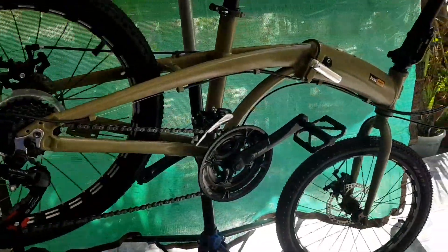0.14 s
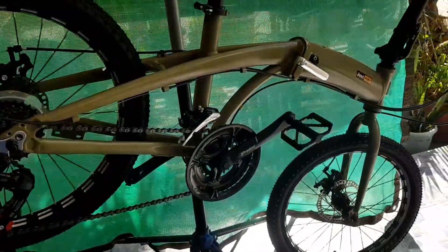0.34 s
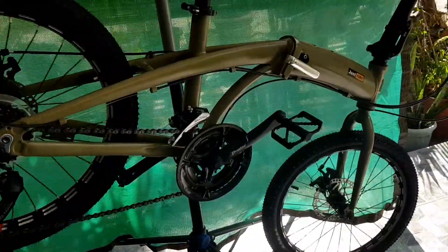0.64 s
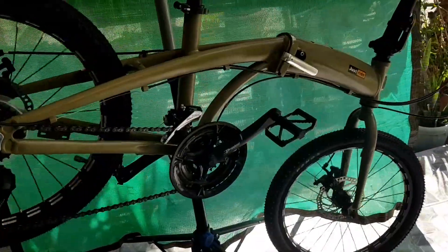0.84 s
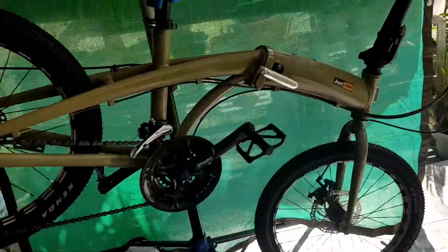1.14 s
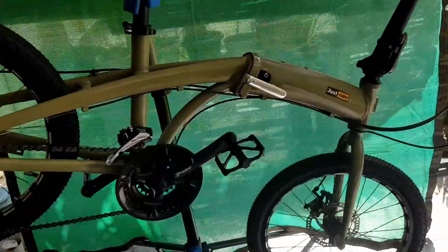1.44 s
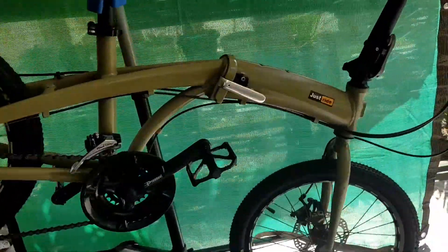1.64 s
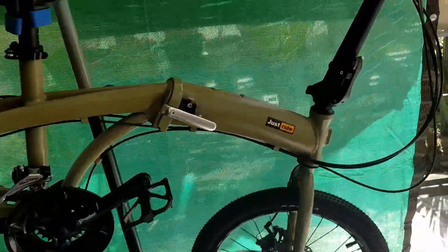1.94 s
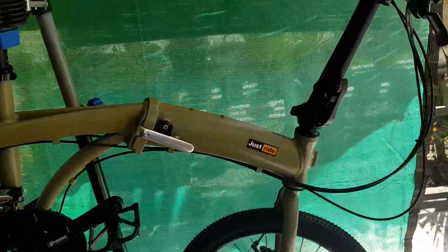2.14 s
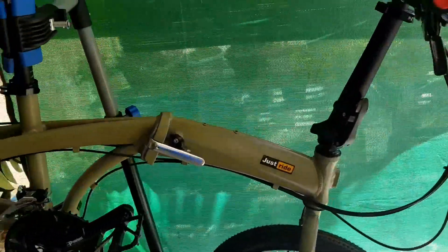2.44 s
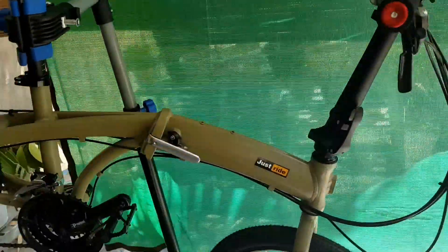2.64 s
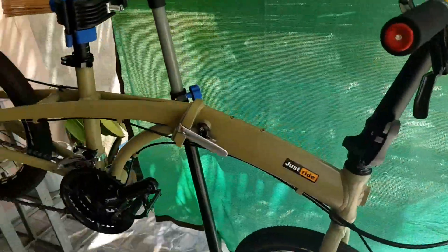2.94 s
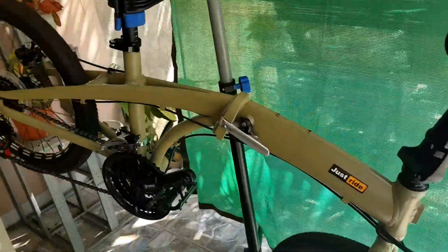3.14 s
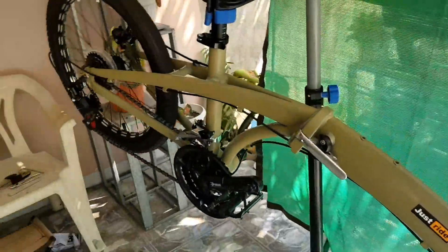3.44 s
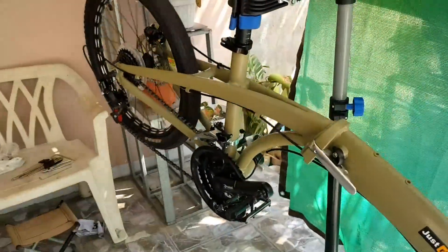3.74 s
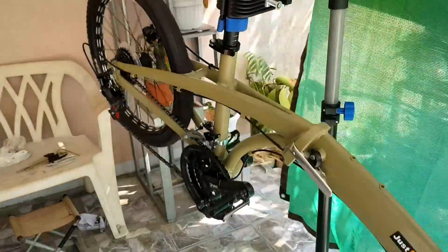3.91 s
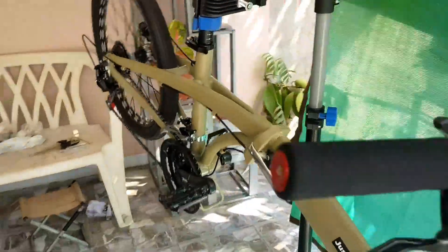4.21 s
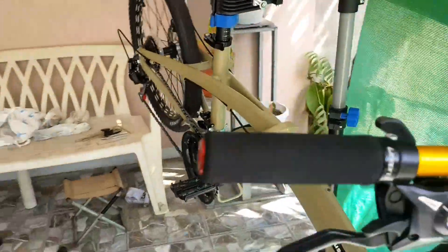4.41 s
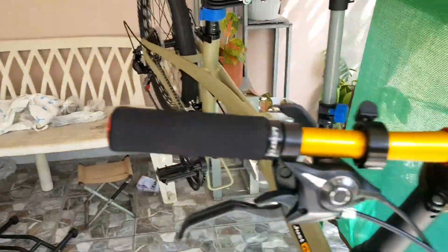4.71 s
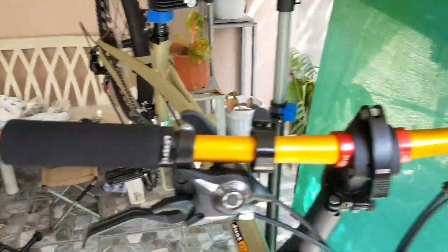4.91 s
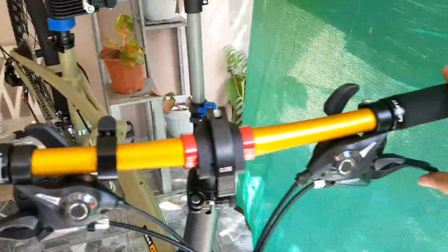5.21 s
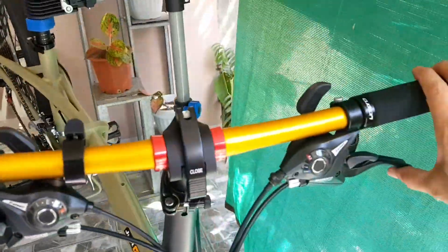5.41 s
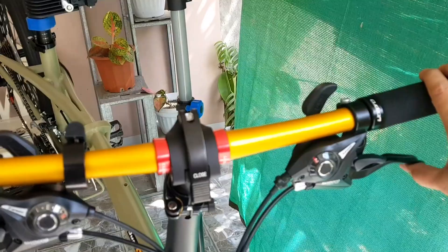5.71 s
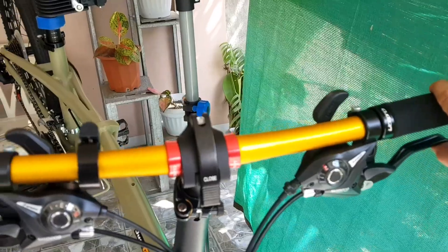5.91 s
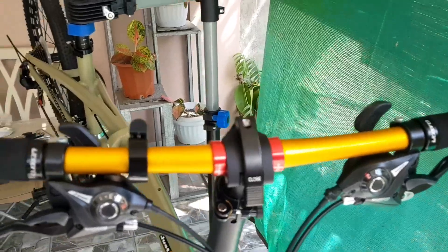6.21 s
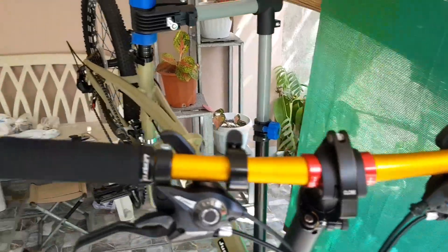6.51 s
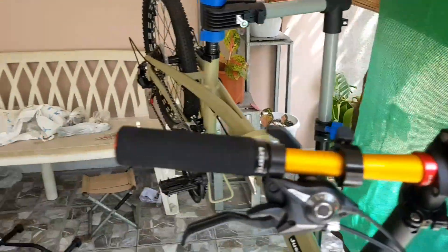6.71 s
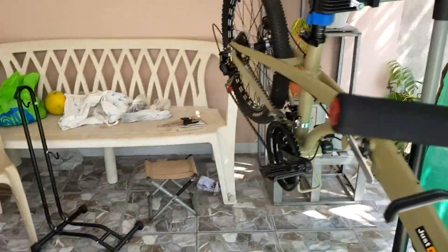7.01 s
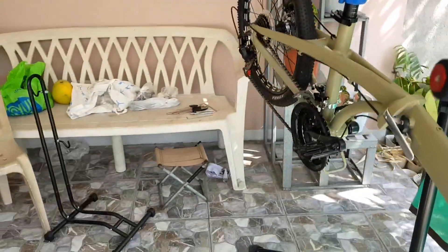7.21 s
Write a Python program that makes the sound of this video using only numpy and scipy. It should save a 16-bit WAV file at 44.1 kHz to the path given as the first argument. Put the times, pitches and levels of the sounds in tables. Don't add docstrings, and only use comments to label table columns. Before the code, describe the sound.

In a small hard-floored covered yard, a steady metallic ratchet buzz of separate crisp clicks gradually slows, with a thin ringing from frame and spokes. Handling bumps, a sharp knock and cloth scuffs strike the moving stereo microphone. Distance softens the clicks and adds short echo. The wheel is braked, a brief gap follows, a lever snaps sharply, and faint wind, distant motor hum and a thin squeak finish.

```python
import sys
import numpy as np
from scipy import signal
from scipy.io import wavfile
from scipy.ndimage import uniform_filter1d

SR = 44100
rng = np.random.default_rng(int(sys.argv[2]) if len(sys.argv) > 2 else 0)


def generate_wav(signal):
    frames = np.transpose(np.atleast_2d(signal))
    scaled = np.clip(frames, -1, 1) * 32767
    pcm = np.round(scaled).astype(np.int16)
    wavfile.write(sys.argv[1], SR, pcm)


def magnitude_from_level(level_db):
    exponent = np.asarray(level_db, float) / 20
    return 10 ** exponent


N = 324135
T = np.arange(N) / SR

# frequency in Hz, level in dB per Hz.
WIND_SPECTRUM = [(15, -42), (30, -5), (52, -8.5), (61, 17), (72, -6), (100, -7), (160, -4.5), (300, -42)]
# start in seconds, length in seconds, level in dB, left-right balance in dB.
GUSTS = [(1.11, .14, -51, 0), (1.56, .38, -63, -4), (2.05, .07, -56, -2), (2.22, .33, -52, -2),
         (2.66, .1, -56, 1), (2.93, .05, -57, 2), (3.43, .17, -54, 0), (3.7, .18, -58, -1),
         (3.92, .06, -47, 1), (4.08, .08, -51, 1), (4.23, .2, -55, -1), (4.5, .14, -53, 0),
         (4.76, .1, -50, 1), (4.92, .1, -51, 7), (5.06, .13, -56, -1), (5.4, .22, -57, 0),
         (5.71, .2, -50, -2), (5.94, .17, -47, 7), (6.15, .1, -43, -10), (6.29, .1, -44, -10),
         (6.41, .1, -49, 0), (6.56, .09, -47, 9), (6.7, .2, -58, 1), (6.95, .1, -57, 2)]
# frequency in Hz, level in dB per Hz.
DRONE_SPECTRUM = [(60, -48.5), (120, 0), (250, -2.5), (450, -3), (600, -15), (1000, -44)]
# frequency in Hz, width in Hz, level in dB.
DRONE_LINES = [(157.4, 1.3, -11.5), (242, 16, -15), (302.5, 5, -11.5), (347.1, 3.7, -9.5),
               (415, 9.9, -10.5), (472.4, 6.7, -13.5), (880, 21, -7)]
# start in seconds, length in seconds, frequency in Hz, level in dB.
MOANS = [(-.2, .72, 57, -57), (2.52, .45, 412, -61), (4.15, .47, 412, -64), (6.18, .55, 158, -57),
         (3.42, 1.25, 62, -57), (1.0, .7, 412, -66), (1.2, .4, 295, -65), (0.1, .7, 235, -66)]
# frequency in Hz, level in dB per Hz.
RUSTLE_SPECTRUM = [(300, -17.5), (600, -2), (900, -2), (1500, -4.5), (4000, -5.5), (7000, -20),
                   (16000, -14.5)]
# frequency in Hz, level in dB per Hz.
HISS_SPECTRUM = [(2000, -12.5), (5000, -31), (7500, -12.5), (10000, 43), (16000, 6)]
# frequency in Hz, likeness from 0 to 1.
LIKENESS = [(60, 0.63), (300, 0.84), (700, 0.25), (1400, 0.15), (5000, 0.057)]
# time in
# seconds, level in dB.
BACKGROUND_LEVEL = [(0, 0.5), (2.95, -0.5), (3.4, -5.5), (3.7, -3), (4.65, -2.5), (5.25, -6.5), (5.7, -5.5),
                    (5.76, -1), (6.1, -3.5), (6.5, -3), (6.85, -9), (7.35, -8.5)]
# time in seconds, left-right balance in dB.
FACING = [(0, 2), (5.6, 2), (6.2, 10), (6.7, 15.5), (7.35, 13)]
# frequency in Hz, time to fall 60 dB in seconds.
ECHO_T60 = [(150, 0.67), (1000, 0.62), (5000, 0.48), (12000, 0.56)]
# start in seconds, length in seconds, level in dB,
# centre frequency in Hz, width in Hz.
SCUFFS = [(1.89, 0.0225, -37.5, 493, 910), (3.926, 0.032, -44, 1100, 1100), (6.302, 0.25, -54.5, 770, 470),
          (3.725, 0.12, -56, 830, 500), (6.545, .016, -42.5, 3000, 6900), (7.03, 0.074, -67.5, 9500, 3000),
          (7.21, 0.22, -67.5, 10500, 5400)]
# time in seconds, frequency in Hz, level in dB.
SQUEAK_PATH = [
    (7.23, 11264, -76),
    (7.258, 12751, -63),
    (7.27, 13300, -63),
    (7.322, 12466, -61),
    (7.35, 12825, -63),
]
# time in seconds, peak in dB, frequency in Hz, left-right balance in dB,
# sharp edge in dB.
KNOCKS = [
    (1.8931, -17.5, 1300, 4, -10),
    (1.898, -37, 1270, 8, 12),
    (1.9035, -39, 430, 7, -30),
    (1.9057, -27, 880, 5, 0),
    (3.9195, -40, 400, 1, -12),
    (3.9315, -37, 500, 5, -8),
    (3.9439, -25, 400, -2, -9),
]
# time in seconds, peak in dB, frequency in Hz, left-right balance in dB, ring in ms.
TICKS = [
    (1.885, -43, 1930, 1.5, 2.9),
    (3.83, -55, 2460, 2.5, 6.2),
    (6.519, -46.5, 2340, 25, 1.6),
    (7.15, -63, 1500, -11, 6.8),
]
# time in seconds, peak in dB, frequency in Hz, left-right balance in dB,
# ring in ms.
BUMPS = [
    (1.112, -37, 96, 13, 12),
    (1.149, -45, 71, 2, 20),
    (1.186, -39, 77, 0.67, 16),
    (1.894, -35, 260, 3, 5),
    (3.9445, -31, 85, 3.5, 10),
]
# time in seconds, peak in dB, left-right balance in dB.
LEVER_SNAP = (6.5612, -8, 11)
# frequency in Hz, width in Hz, level in dB.
LEVER_MODES = [(166, 12, -7), (534, 53, -15), (980, 120, -1.5), (1500, 690, 0), (2080, 270, -7),
               (3040, 1400, 3.5), (3374, 25, -18), (4100, 1600, 2), (5400, 810, -6), (7440, 1000, -3),
               (9100, 380, 7), (11000, 740, -14), (13500, 870, -6.5), (14200, 1600, -10)]
# time in seconds, #
# frame and spoke ring in dB, distance from 0 near to 1 far, snap level in dB.
HUB = [(0, -51, .1, -38), (.6, -55, 0.1, -36), (1.25, -50.5, 0.095, -38.5), (1.65, -50.5, 0.14, -37.5),
       (2.2, -50, 0.42, -39), (2.75, -55, 0.45, -41.5), (3.25, -52.5, 0.67, -41.5),
       (3.65, -54, 0.57, -39.5), (4.2, -50.5, 0.73, -40.5), (4.8, -49.5, 0.91, -41.5),
       (5.3, -54.5, 0.72, -42.5), (5.72, -53.5, 0.96, -41.5), (5.745, -48.5, 0.88, -37.5),
       (6.0, -50, 1, -36.5), (6.1, -55, 1, -40)]
# frequency in Hz, width in Hz, level in dB.
FRAME_MODES = [(1426, 45, -3), (1560, 69, 3), (1938, 36, 5.5), (2045, 30, 6.5), (2162, 24, 4.5),
               (2230, 160, 3), (2386, 32, 10.5), (2473, 22, 1.5), (2534, 210, 2)]
# frequency in Hz, width in Hz, level in dB.
SHELL_MODES = [(2200, 440, -8), (3420, 1940, -9), (4650, 1620, -7.5), (6100, 1230, -8.5),
               (7930, 1900, -11.5), (9000, 300, -3.5), (10280, 670, -9), (11580, 1900, 0), (12680, 1100, 1),
               (14080, 1250, 5.5), (15030, 610, -12)]
WOBBLE = [(1, .013, -1.03), (2, .023, -1.9), (6, .011, .25)]
HARD_TEETH = [0, 4, 15, 21, 22, 32, 35, 41, 42, 52, 54, 63, 77, 82, 90, 91, 95, 113, 115, 117, 142, 156,
              157, 169]
BRAKED_S = [5.9019, 5.939, 5.9917]

COASTED = 181
TOOTH_COUNT = COASTED + len(BRAKED_S)


def evened(x):
    return x / np.sqrt(np.mean(x ** 2) + 1e-20)


def read(points, hz):
    f, value = np.transpose(points)
    return np.interp(np.log(hz + 1), np.log(f + 1), value)


def curve(rows, axis):
    return np.interp(T, [r[0] for r in rows], [r[axis] for r in rows])


def mode(x, hz, width):
    return signal.lfilter(*signal.iirpeak(min(hz, SR / 2 - 500), hz / width, SR), x)


def swell(start, length, rise, fall):
    t = T[::16]
    attack = np.clip((t - start) / rise, 0, 1)
    release = np.exp(-np.maximum(t - start - length, 0) / fall)
    return np.repeat(attack * release, 16)[:N]


def wander(count, size):
    steps = evened(uniform_filter1d(rng.standard_normal((count, N // 100 + 1)), size, axis=1))
    return uniform_filter1d(np.repeat(steps, 100, axis=1)[:, :N], size=400, axis=1)


def drift(count):
    return evened(uniform_filter1d(rng.standard_normal((count, TOOTH_COUNT)), 3, axis=1))


def noise(spectrum, patchy_db, size=1024):
    hz = np.fft.rfftfreq(size, 1 / SR)
    used = hz[hz <= spectrum[-1][0]]
    a, b, c, d, patches = rng.standard_normal((4 * N // size + 5, len(used), 5)).T
    patches = uniform_filter1d(patches, size=6, axis=0)
    patches = evened(uniform_filter1d(patches, size=10, axis=1))
    same = np.clip(read(LIKENESS, used), -1, 1)[:, None]
    left = a + 1j * b
    right = same * left + np.sqrt(1 - same ** 2) * (c + 1j * d)
    z = np.zeros((2, len(hz), a.shape[1]), complex)
    z[:, :len(used)] = [left, right]
    z[:, :len(used)] *= magnitude_from_level(read(spectrum, used)[:, None] + patchy_db * patches)
    return evened(signal.istft(z, nperseg=size, noverlap=size * 3 // 4)[1][:, :N])


def ports(x, pan_db, lag):
    return np.array([x * magnitude_from_level(pan_db / 2), np.roll(x, lag) * magnitude_from_level(-pan_db / 2)])


def echo(x, gap_s=0.002, shorter=0.69, count=3):
    length = SR // 4
    taps = rng.standard_normal((count, 2, length)) * (np.arange(length) > gap_s * SR)
    hz, t, z = signal.stft(taps, SR, nperseg=128)
    decay = magnitude_from_level(-60 * t / read(ECHO_T60, hz)[:, None] / shorter)
    tails = signal.istft(z * decay, SR, nperseg=128)[1]
    out = np.zeros((2, N))
    for k, tail in enumerate(tails):
        share = np.sqrt(2 / count) * np.cos(2 * np.pi * (7.3 * T + k / (2 * count)))
        tail = tail / np.linalg.norm(tail[0])
        out += signal.oaconvolve((x * share)[None], tail, axes=1)[:, :N]
    return out


def wind():
    rise_s, fall_s, calm_db = 0.025, 0.019, -66
    level = magnitude_from_level(calm_db)
    for s, length, db, pan_db in GUSTS:
        level = level + magnitude_from_level(db + pan_db / np.array([[2], [-2]])) * swell(s, length, rise_s, fall_s)
    return noise(WIND_SPECTRUM, 2.0, size=2048) * level


def moans():
    waver_hz, waver_db = 2.5, 2.5
    pitch, level = wander(count=2, size=25)
    waver = np.cumsum(waver_hz * pitch) / SR
    notes = np.zeros(N)
    for s, length, hz, db in MOANS:
        notes += magnitude_from_level(db) * np.sin(2 * np.pi * (hz * T + waver)) * swell(s, length, 0.023, 0.016)
    return np.sqrt(2) * notes * magnitude_from_level(waver_db * level)


def yard_boom():
    boom_db, rise_s, fall_s = 18.5, 0.03, 0.038
    return 1 + magnitude_from_level(boom_db) * swell(LEVER_SNAP[0], rise_s, rise_s, fall_s)


def motor_drone():
    drone_db, flicker_db = -55.5, 0.9
    broad = noise(DRONE_SPECTRUM, 1.57, size=2048)
    lines = sum(magnitude_from_level(db) * evened(mode(broad, hz, width)) for hz, width, db in DRONE_LINES)
    level_db = drone_db + curve(BACKGROUND_LEVEL, axis=1) + flicker_db * wander(count=1, size=40)[0]
    drone = evened(broad + lines) * magnitude_from_level(level_db) * yard_boom()
    return (drone + moans()) * magnitude_from_level([[1.2], [-1.2]])


def rustle_and_hiss():
    rustle_db, follows_yard, flicker_db, hiss_db = -56, 0.98, 0.9, -90
    level_db = rustle_db + follows_yard * curve(BACKGROUND_LEVEL, axis=1) + flicker_db * wander(count=1, size=40)[0]
    rustle = noise(RUSTLE_SPECTRUM, 1.64) * magnitude_from_level(level_db) * yard_boom()
    hiss = noise(HISS_SPECTRUM, 1.64) * magnitude_from_level(hiss_db)
    return (rustle + hiss) * magnitude_from_level(curve(FACING, axis=1) / [[2], [-2]])


def scuffs():
    out = np.zeros((2, N))
    rub = noise([(100, 0), (16000, 0)], 0.52, size=256)
    for s, length, db, hz, width in SCUFFS:
        part = slice(round(s * SR), round((s + length) * SR))
        stroke = abs(np.sin(np.pi * (T[part] - s) / length)) ** 0.37
        out[:, part] += magnitude_from_level(db) * evened(mode(rub[:, part], hz, width)) * stroke
    return out * magnitude_from_level([[2.5], [-2.5]])


def squeak():
    split = 0.03
    wobble, grip = uniform_filter1d(rng.standard_normal((2, N)), size=120, axis=1)
    turns = np.cumsum(curve(SQUEAK_PATH, axis=1) * (1 + 0.12 * wobble)) / SR
    pair = np.sin(2 * np.pi * turns) + 0.49 * np.sin(2 * np.pi * (1 + split) * turns)
    level = magnitude_from_level(curve(SQUEAK_PATH, axis=2) + 2 * evened(grip) + 4.0)
    return ports(pair * level * (T > SQUEAK_PATH[0][0]), 7.8, lag=5)


def knocks():
    knock_ring_ms, tick_edge_db, bump_edge_db = 1.4, -3, -60
    pitch_sag, opposed = 0.1, 0.84
    out = np.zeros((2, N))
    t = np.arange(6000) / SR
    rows = [(*k[:-1], knock_ring_ms, k[-1]) for k in KNOCKS]
    rows += [(*k, tick_edge_db) for k in TICKS]
    rows += [(*k, bump_edge_db) for k in BUMPS]
    for s, db, hz, pan_db, ring_ms, edge_db in rows:
        u = t * 2300 / ring_ms / 0.71
        envelope = (u / 2 * np.exp(1 - u / 2)) ** 2
        sag = 1 / (1 + pitch_sag * (ring_ms == knock_ring_ms) * t * 500)
        swing = np.sign(200 - hz) * np.sin(2 * np.pi * hz * t * sag) * envelope
        swing[:40] += magnitude_from_level(edge_db) * rng.standard_normal(40) * np.exp(-np.arange(40) / 5.7)
        jolt = opposed * (hz > 300) * np.sin(2 * np.pi * 230 * t) * np.exp(-t / 0.0037)
        out[:, round(s * SR):][:, :len(t)] += magnitude_from_level(db) * (ports(swing, pan_db, lag=0) + jolt * [[1], [-1]])
    return out


def lever():
    rise_ms, fall_ms = 0.91, 2.4
    chatter_db, chatter_ms, echo_db = -12, 26.0, -4.0
    s, db, pan_db = LEVER_SNAP
    ms = np.maximum(T - s, 0) * 1000
    crack = np.minimum(ms / rise_ms, 1) ** 2 * np.exp(-np.maximum(ms - rise_ms, 0) / fall_ms)
    chatter = magnitude_from_level(chatter_db) * (ms > 0) * np.exp(-ms / chatter_ms)
    drive = ((crack + chatter) * rng.standard_normal(N))[-SR:]
    hit = sum(magnitude_from_level(d) * evened(mode(drive, hz, width)) for hz, width, d in LEVER_MODES)
    hit = np.r_[np.zeros(N - SR), hit * magnitude_from_level(db) / abs(hit).max()]
    return ports(hit, pan_db, lag=16) + magnitude_from_level(echo_db) * echo(hit, count=2) * magnitude_from_level([[2.5], [-2.5]])


def tooth_times():
    teeth_per_turn, first_s = 20, 0.0194
    speed, drag, easing = 1.76227, 0.079086, 0.001494
    teeth, t = np.arange(COASTED), T - first_s
    late = sum(size * np.cos(2 * np.pi * waves * teeth / teeth_per_turn + phase) for waves, size, phase in WOBBLE)
    turns = speed * t - drag * t ** 2 / 2 + easing * t ** 3 / 6
    return np.r_[np.interp((teeth + late) / teeth_per_turn, turns, T), BRAKED_S]


def tooth_db(s):
    hard_db, scatter_db = 3, 0.8
    hard = np.isin(np.arange(len(s)), HARD_TEETH)
    level_db = curve(HUB, axis=3)[(s * SR).astype(int)]
    return level_db + hard_db * hard + scatter_db * rng.standard_normal(len(s))


def frame_ring():
    turning_db, shake_db = 6.0, -4
    delay = rng.integers(30, 200, (len(FRAME_MODES), 2, TOOTH_COUNT))
    at = (tooth_times() * SR).astype(int) + delay
    shake = noise([(100, 0), (16000, 0)], 3.9, size=256)
    ring = np.zeros((2, N))
    for (hz, width, db), ports_at, turn in zip(FRAME_MODES, at, drift(len(FRAME_MODES))):
        kicks = np.array([np.bincount(a, magnitude_from_level(turning_db * turn), N) for a in ports_at])
        struck = evened(mode(kicks, hz, width))
        shaken = evened(mode(shake, hz, 2 * width))
        ring += magnitude_from_level(db) * (struck + magnitude_from_level(shake_db) * shaken)
    stop = np.clip((6.12 - T) / 0.07, 0, 1)
    return evened(ring) * magnitude_from_level(curve(HUB, axis=1)) * stop * magnitude_from_level([[1.6], [-1.6]])


def freehub():
    near_ms, far_ms, count = 0.45, 3.0, 30
    bounce_ms, bounce_db, hard_spread = 4.2, -7, 0.6
    colour_db, dull_db, far_fade_db = 1.3, -4, -5
    slow_hz, slow_spread = 8500, 2.2
    blur = 1.6
    s = tooth_times()
    far = np.clip(curve(HUB, axis=2), 0, 1)
    far_tooth = far[(s * SR).astype(int), None]
    spread_ms = near_ms + (far_ms - near_ms) * far_tooth[:, None]
    delay = spread_ms * rng.gamma(1.3, 1.5, (len(s), 2, count))
    slow = (delay * (slow_spread - 1) * SR / 1000).astype(int).reshape(len(s), -1)
    delay[:, 1] += bounce_ms * rng.uniform(0.7, 1.4, (len(s), 1))
    delay[HARD_TEETH] *= hard_spread
    size = rng.choice([-1., 1.], delay.shape)
    size[:, 1] *= magnitude_from_level(bounce_db + 3.0 * rng.standard_normal((len(s), 1)))
    at = ((s[:, None, None] + delay / 1000) * SR).astype(int).reshape(len(s), -1)
    size = size.reshape(at.shape)
    snap = np.zeros((2, N))
    for (hz, width, db), colour in zip(SHELL_MODES, drift(len(SHELL_MODES))):
        dulling = dull_db * far_tooth * (hz / 14000) ** 2
        beam = far_fade_db * far_tooth * (slow_hz < hz < 9600)
        weight = size * magnitude_from_level(colour_db * colour[:, None] + dulling + beam)
        turned = at + rng.integers(4, 16, (len(s), 1))
        hits = np.array([at, turned]) + slow * (hz < slow_hz)
        drops = np.array([np.bincount(a.ravel(), weight.ravel(), N) for a in hits])
        ring = mode(mode(drops, hz, blur * width), hz, blur * width)
        snap += magnitude_from_level(db) * ring / np.sqrt(width)
    tooth = np.maximum(np.searchsorted(s, T) - 1, 0)
    energy = np.bincount(tooth, (snap ** 2).mean(0)) / (0.017 * SR)
    snap *= (magnitude_from_level(tooth_db(s) - 1.98) / np.sqrt(energy))[tooth]
    answer = echo(snap[0] * magnitude_from_level(-5.0 + 4.0 * far), shorter=0.44)
    return snap * magnitude_from_level([[2], [-1]]) + answer * magnitude_from_level([[1.1], [-1.1]])


def scene():
    yard = wind() + motor_drone() + rustle_and_hiss()
    handling = scuffs() + squeak() + knocks() + lever()
    return yard + handling + frame_ring() + freehub()


def gate(x):
    low_hz, high_hz, off_s = 2750, 8500, 5.74
    under_db, depth_db = -4.5, -28
    far_s, far_hz, far_db = 1.93, 4600, 2.2
    hz, t, z = signal.stft(x, SR, nperseg=1024)
    power = (abs(z) ** 2).mean(0)
    band = uniform_filter1d(uniform_filter1d(power, size=4, axis=0), size=3, axis=1)
    usual = uniform_filter1d(uniform_filter1d(power, size=12, axis=0), size=60, axis=1)
    harder = far_db * (hz < far_hz)[:, None] * (t > far_s)
    weak = band < usual * magnitude_from_level(2 * under_db + 2 * harder)
    middle = ((hz > low_hz) & (hz < high_hz))[:, None]
    shut = weak & middle & (t < off_s)
    return signal.istft(z * magnitude_from_level(depth_db * shut), SR, nperseg=1024)[1][:, :N]


def low_pass(x):
    return signal.sosfilt(signal.butter(12, 16460, fs=SR, output="sos"), x)


def record(dry):
    edge = signal.firwin(151, 15600, window=("kaiser", 8), fs=SR)
    limited = signal.oaconvolve(dry, edge[None], "same")
    return low_pass(gate(limited))


dry = scene()
out = record(dry)
generate_wav(out)
```